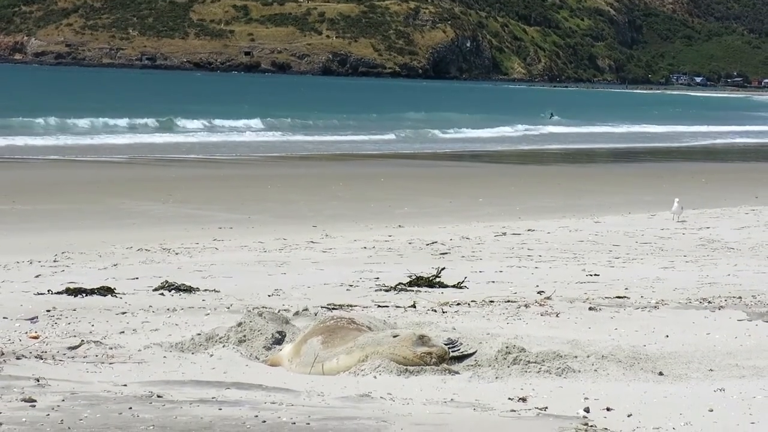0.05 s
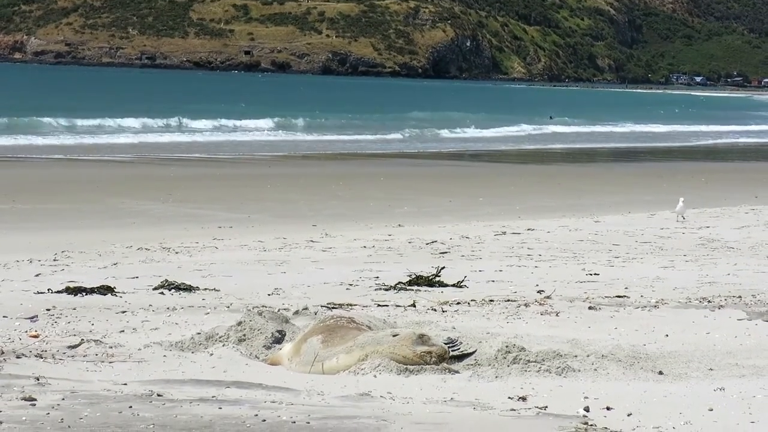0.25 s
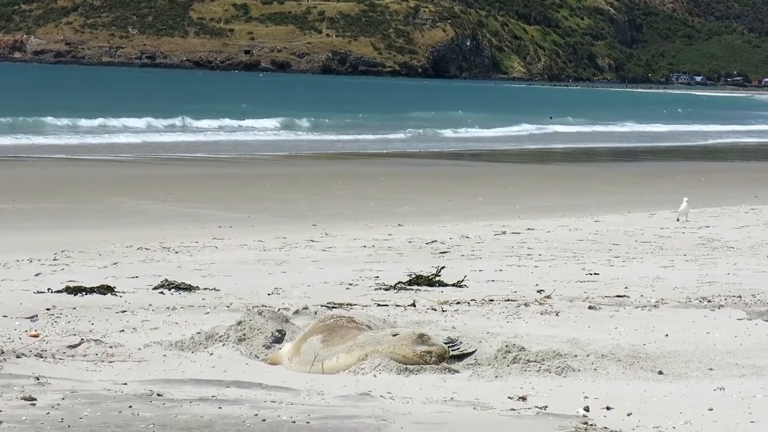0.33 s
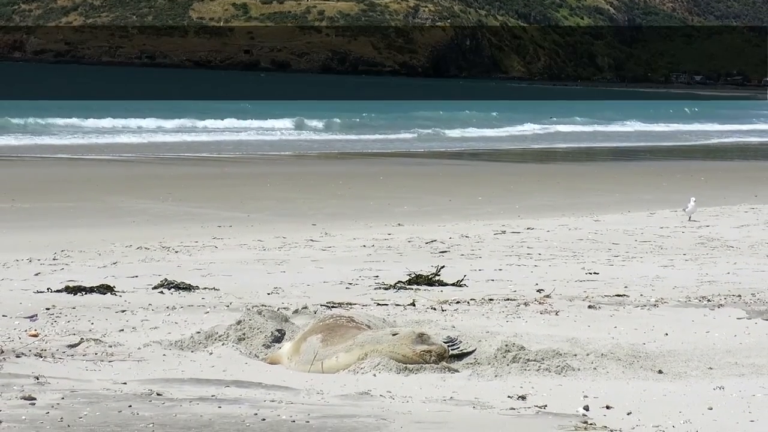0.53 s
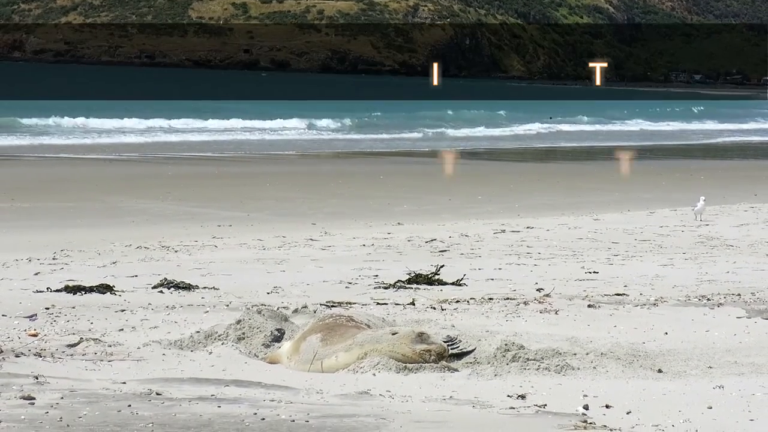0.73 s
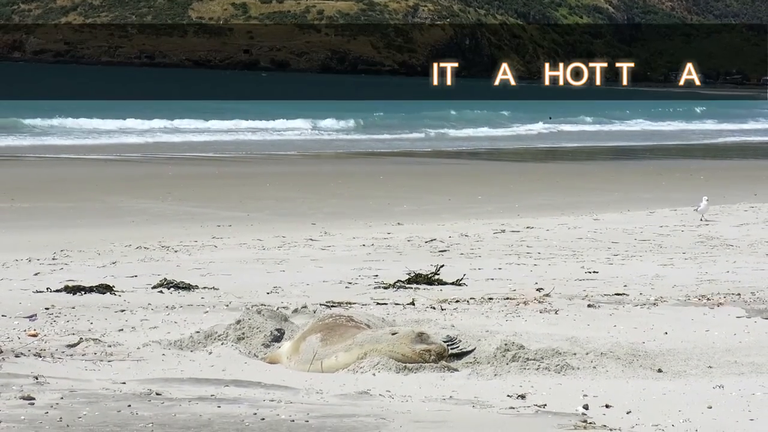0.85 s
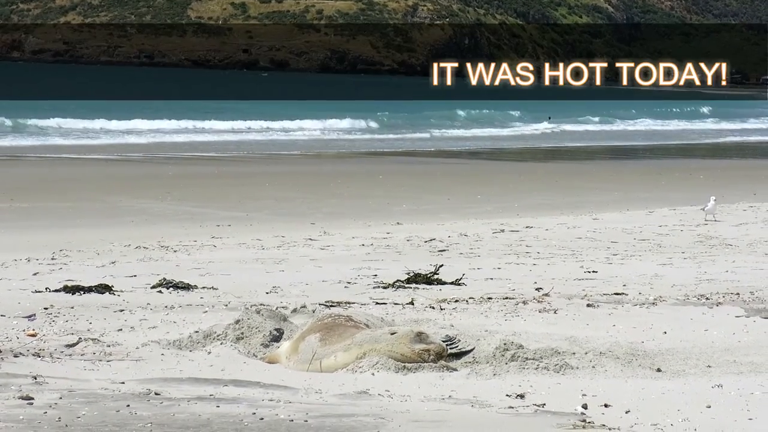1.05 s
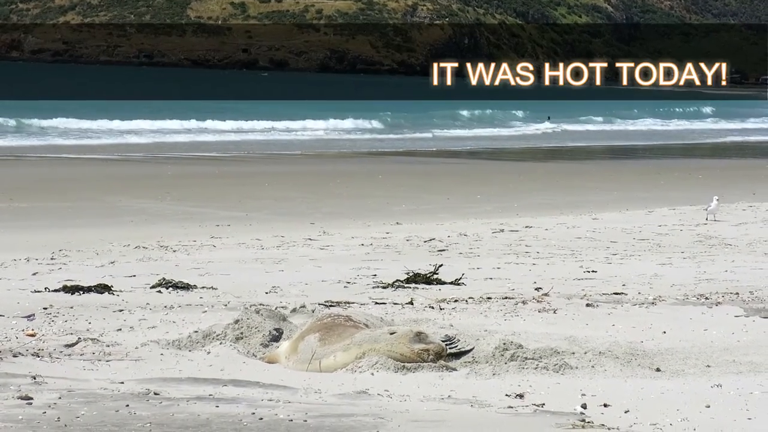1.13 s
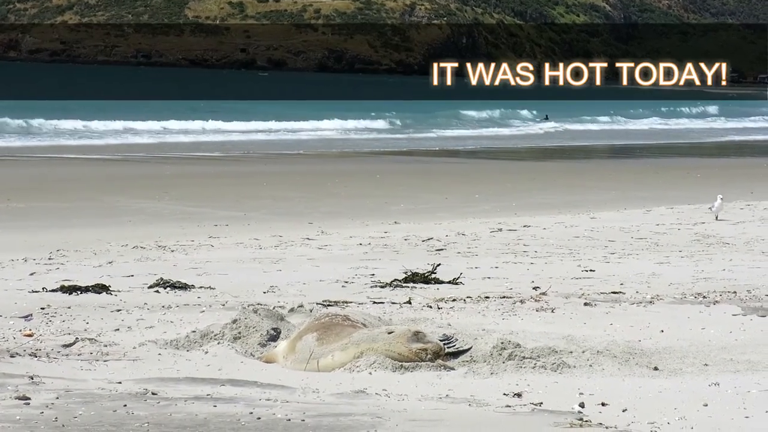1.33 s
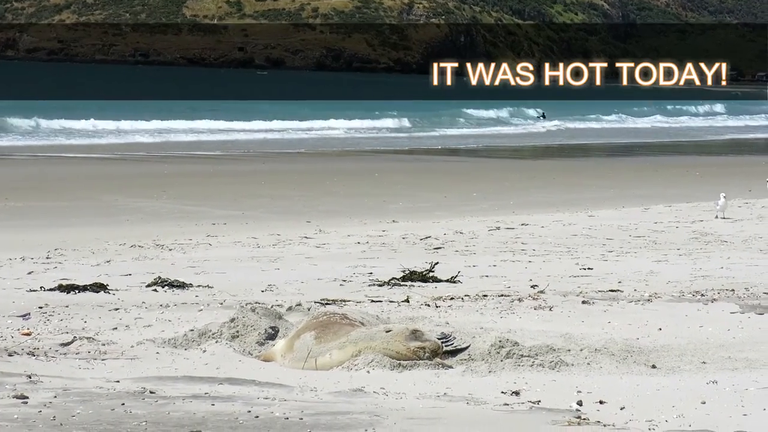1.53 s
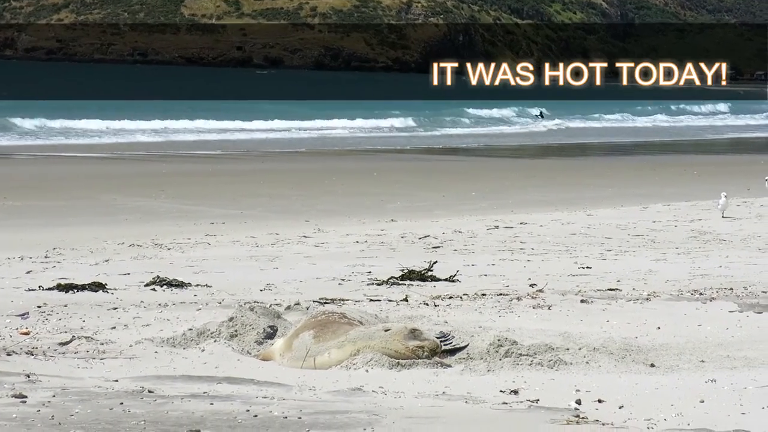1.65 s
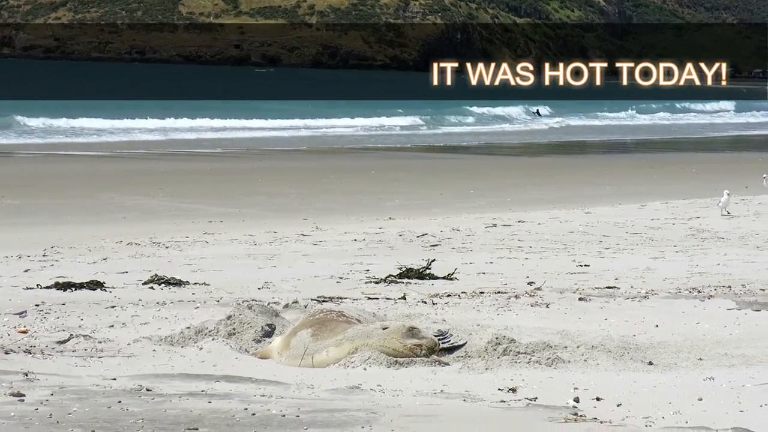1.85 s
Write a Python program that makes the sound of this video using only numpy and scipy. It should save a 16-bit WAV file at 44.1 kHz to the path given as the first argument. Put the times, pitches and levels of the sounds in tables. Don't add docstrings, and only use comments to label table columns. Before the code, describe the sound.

Wind gust buffets and thumps the microphone on an open beach, over soft distant surf wash

```python
import sys
import numpy as np
from scipy import signal
from scipy.fft import rfft, irfft
from scipy.io import wavfile
from scipy.ndimage import uniform_filter1d

SR = 44100
rng = np.random.default_rng(int(sys.argv[2]) if len(sys.argv) > 2 else 0)


def dump_mix(stems):
    frames = np.atleast_2d(stems).T
    limited = np.clip(frames, -1, 1)
    pcm = np.round(limited * 32767).astype(np.int16)
    wavfile.write(sys.argv[1], SR, pcm)


def field_ratio(decibels):
    return 10 ** (np.asarray(decibels, dtype=float) / 20)


N = 83790
T = np.arange(N) / SR


def rms_one(x):
    return x / np.sqrt(np.mean(x ** 2) + 1e-20)


def in_time(rows):
    seconds, *columns = np.transpose(rows)
    return [np.interp(T, seconds, column) for column in columns]


def at_hz(points, hz):
    table_hz, values = np.array(points).T
    return np.interp(np.log(hz), np.log(table_hz), values)


def drift(rate_hz):
    r = np.exp(-2 * np.pi * rate_hz * 40 / SR)
    slow = signal.lfilter([1], [1, -2 * r, r * r], rng.standard_normal(N // 40 + 2002))
    slow = rms_one(slow[2000:])
    return np.interp(np.arange(N) / 40, np.arange(len(slow)), slow)


def coloured(spectrum, even_s=0):
    hz = np.maximum(np.arange(N // 2 + 1) * SR / N, 1)
    octaves_outside = np.abs(np.log2(hz / np.clip(hz, spectrum[0][0], spectrum[-1][0])))
    db = at_hz(spectrum, hz) - 24 * octaves_outside
    x = rms_one(irfft(rfft(rng.standard_normal(N)) * field_ratio(db), N))
    if even_s:
        x = x / np.sqrt(uniform_filter1d(x ** 2, int(even_s * SR)) + 0.07)
    return rms_one(x)


# centre in seconds, level in dB, length in seconds, flap over thud in dB.
BUFFETS = [(0.387, -39.5, 0.016, -20), (0.445, -43, 0.019, -21), (0.481, -39.5, 0.02, -23),
           (0.53, -35, 0.015, -11), (0.58, -26, 0.009, -7), (0.608, -32, 0.021, -11),
           (0.656, -17.5, 0.018, 5), (0.681, -18, 0.024, -6), (0.736, -22.5, 0.02, 0),
           (0.766, -29.5, 0.022, -1), (0.779, -31, 0.0072, 12), (0.804, -29, 0.023, -3),
           (0.827, -30.5, 0.012, -6), (0.891, -23.5, 0.017, -12.5), (0.925, -17, 0.018, 1.5),
           (0.984, -16.5, 0.016, 5.5), (1.009, -15.5, 0.014, 12), (1.04, -27, 0.006, 14),
           (1.057, -24, 0.013, 8), (1.079, -24, 0.036, -4.5), (1.121, -47, 0.015, -2),
           (1.183, -42.5, 0.039, -9), (1.266, -20.5, 0.0057, -2), (1.298, -32, 0.0085, 11),
           (1.312, -26.5, 0.019, -4), (1.361, -22.5, 0.027, -6.5), (1.407, -41.5, 0.024, 4),
           (1.457, -17, 0.0033, 7), (1.467, -23.5, 0.032, -3), (1.492, -20, 0.0067, 12),
           (1.525, -39.5, 0.0058, 12), (1.548, -32, 0.008, -2.5), (1.605, -38, 0.0052, 0),
           (1.526, -52, 0.05, -18), (1.591, -31.5, 0.02, -9), (1.629, -30.5, 0.0096, -9),
           (1.654, -26, 0.014, 8)]
# time in seconds, level in dB.
GUST = [(0, -60), (.34, -49), (.38, -52.5), (.56, -44), (.66, -40.5), (.86, -33.5), (1.05, -32.5),
        (1.14, -40), (1.21, -47.5), (1.25, -44), (1.275, -26), (1.42, -41), (1.5, -35), (1.66, -45.5),
        (1.71, -61.5), (1.9, -66)]
# time in seconds, dB over opposed thud.
VEER = [(0, -19), (.4, -7), (.58, -21), (.68, -13), (.735, -9.5), (.8, -15.5), (.9, -17.5), (1.0, -12.5),
        (1.1, -15.5), (1.2, -16), (1.28, -15), (1.36, -16), (1.42, -15.5), (1.55, -18.5), (1.65, -18.5),
        (1.9, -18)]
# pitch in Hz, level in dB per Hz.
THUD = [(20, -30), (40, -9.5), (60, -4), (90, 5.5), (130, -1), (190, -10), (300, -45)]
# pitch in Hz, level in dB per Hz.
RUMBLE = [(20, -18), (40, -12), (65, 2), (90, 4), (130, 3.5), (190, -4), (300, -35)]
# pitch in Hz, level in dB per Hz.
FLAP = [(80, -21.5), (140, 0.5), (200, -0.5), (300, -5.5), (450, -17), (700, -25.5), (1100, -66),
        (2000, -50)]


def wind():
    gust_flap_db, flap_per_db, gust_lumps_db = 5.5, 2, -4.5
    rise_share, fall_share, evening_s = 0.29, 0.55, 0.012
    left_db, right_db, common_flap_db = 0.5, -2.1, -25.5
    right_port_hz = 950

    gust_db, = in_time(GUST)
    thud_power = field_ratio(gust_db + gust_lumps_db * drift(25)) ** 2
    flap_power = thud_power * field_ratio(gust_flap_db + flap_per_db * (gust_db - gust_db.max())) ** 2
    for s, db, length, flap_db in BUFFETS:
        width = length * np.where(T < s, rise_share, fall_share)
        power = field_ratio(db) ** 2 * np.exp(-((T - s) / width) ** 2)
        thud_power = thud_power + power / (1 + field_ratio(flap_db) ** 2)
        flap_power = flap_power + power / (1 + field_ratio(-flap_db) ** 2)

    thud = np.sqrt(thud_power) * coloured(THUD, 1.2 * evening_s)
    rumble = np.sqrt(thud_power) * coloured(RUMBLE, 1.2 * evening_s)
    flap = np.sqrt(flap_power) * coloured(FLAP, evening_s)
    common_flap = np.sqrt(flap_power) * coloured(FLAP, evening_s)

    yielding = after_slam()
    opposed = yielding * (thud + flap) + slams() + rasps(evening_s / 2)
    left = field_ratio(left_db) * opposed
    right = -field_ratio(right_db) * opposed
    right = signal.lfilter(*signal.butter(1, right_port_hz, fs=SR), right)
    veer_db, = in_time(VEER)
    common = field_ratio(veer_db) * rumble + yielding * field_ratio(common_flap_db) * common_flap
    return np.array([left, right]) + common


# start in seconds, peak in dB, ring in Hz, direction of the first push (1 or -1).
SLAMS = [(.5698, -21, 200, -1), (.6535, -20, 190, 1), (.6804, -3, 170, -1), (.7055, -14.5, 150, 1),
         (.7245, -12.5, 185, -1), (.77, -21, 180, 1), (.9015, -18, 130, -1), (.9255, -21, 280, -1),
         (.9815, -12, 190, -1), (1.0073, -14, 150, 1), (1.0589, -12, 230, -1), (1.0655, -11, 190, 1),
         (1.0782, -18, 120, 1), (1.2608, -23, 250, 1), (1.2742, -15, 170, -1), (1.2894, -14, 170, 1),
         (1.2988, -18, 280, -1), (1.3033, -7.5, 165, -1), (1.3703, -19, 170, -1), (1.448, -22, 260, 1),
         (1.4615, -20, 240, -1), (1.4632, -18, 120, 1), (1.4845, -23, 150, -1), (1.5103, -26, 220, 1),
         (1.6325, -27, 150, -1), (1.6555, -27, 230, -1)]


def slams():
    t60_s, rise_s, soft_hz = 0.034, 0.0009, 850
    out = np.zeros(N)
    t = np.arange(SR // 5) / SR
    for s, db, hz, direction in SLAMS:
        i = int(s * SR)
        swell = field_ratio(db - 60 * t / t60_s + 1.5) * (1 - np.exp(-t / rise_s))
        out[i:i + len(t)] += np.sign(direction) * swell * np.sin(2 * np.pi * hz * t)
    return signal.sosfilt(signal.butter(3, soft_hz, fs=SR, output="sos"), out)


def after_slam():
    yield_s, yield_share = 0.009, 0.8
    dips = [np.exp(-((T - s - yield_s / 2) / yield_s) ** 4) for s, *_ in SLAMS]
    return np.prod([1 - yield_share * dip for dip in dips], axis=0)


# centre in seconds, level in dB, length in seconds.
RASPS = [(.6815, -35.5, .003), (0.736, -43.5, 0.0046), (0.925, -43, 0.0064), (0.991, -44, 0.0091),
         (1.014, -47.5, 0.0099), (1.066, -42, 0.01), (1.274, -40, 0.0051), (1.3004, -37.5, 0.0062),
         (1.356, -47, .005), (1.454, -41.5, .006), (1.51, -49, 0.0033)]
# pitch in Hz, level in dB per Hz.
RASP = [(250, -16), (400, 6), (600, 1), (900, -12), (1100, -17.5), (1500, -19.5)]


def rasps(even_s):
    shape = sum(field_ratio(db) * np.exp(-((T - s) / length) ** 2) for s, db, length in RASPS)
    return shape * coloured(RASP, even_s)


# time in seconds, level in dB, brightness in dB per octave.
WAVES = [(0, -51, 1), (.12, -49, -0.67), (.25, -49, 0.2), (.38, -49, -0.2), (.5, -47.5, -0.3),
         (.6, -47.5, -0.1), (.68, -48.5, 1.2), (.78, -49.5, 0.54), (.9, -51, 0.76), (1.05, -53.5, 0.5),
         (1.18, -52, 0), (1.3, -48.5, -1.5), (1.4, -49, -0.3), (1.5, -47, -1.2), (1.62, -48.5, -1),
         (1.75, -48.5, -1), (1.9, -49.5, -0.5)]
# pitch in Hz, level in dB per Hz.
SURF = [(30, -11), (100, -6.5), (220, 0), (450, -4.5), (1000, -8.5), (3000, -18), (7000, -34.5),
        (15500, -49.5)]
# pitch in Hz, width in Hz, lift in dB.
HOUSING = [(653, 160, 6), (1985, 1060, 5.5), (4547, 1380, 13)]
# pitch in Hz, likeness from -1 to 1.
LIKENESS = [(60, -1), (200, 0.9), (380, -0.22), (700, 0.35), (1290, 0.35), (2380, 1), (5300, 0.91),
            (8600, -0.64)]
# pitch in Hz, left minus right in dB.
LEFTWARD = [(200, -0.5), (400, 2), (700, 2), (1300, 11.5), (2400, 3.5), (4400, 4), (8000, -5.5), (15000, 3)]


def surf():
    patchy_db, bright_top_hz = 0.73, 4740
    left_lag_samples = -2
    level_db, tilt = in_time(WAVES)
    out, together, near = 0, drift(7.0), drift(8.0)
    edges = 30 * 2 ** np.arange(0, 9.2, 0.4)
    white = rng.standard_normal((2, 2, N + 4000))
    for k, (low, high) in enumerate(zip(edges, edges[1:])):
        band = signal.butter(2, [low, high], "band", fs=SR, output="sos")
        mid, side = signal.sosfilt(band, white[k % 2])[:, -N:]
        hz, following = np.sqrt(low * high), drift(9.5)
        lift_db = sum(db / (1 + (2 * (hz - centre_hz) / wide) ** 2) for centre_hz, wide, db in HOUSING)
        bright_db = tilt * np.log2(min(hz, bright_top_hz ** 2 / hz) / 1000)
        flicker = 0.5 * together + 0.54 * (near + following) + 0.28 * drift(25)
        gain = field_ratio(at_hz(SURF, hz) + lift_db + bright_db + patchy_db * flicker)
        pan = field_ratio(at_hz(LEFTWARD, hz) * np.array([[0.5], [-0.5]]))
        alike = np.clip(at_hz(LIKENESS, hz), -0.99, 0.99)
        pair = np.sqrt(1 + alike) * mid + np.sqrt(1 - alike) * side * [[1], [-1]]
        out = out + gain * pan * pair
        near = following
    left, right = field_ratio(level_db) * rms_one(out)
    return np.array([np.roll(left, left_lag_samples), right])


# start in seconds, gain in dB.
CLAMPS = [
    (0.687, -5),
    (1.067, -6.5),
    (1.312, -9),
]


def limiter_gain():
    attack_s, release_db_per_s = 0.0075, 12
    clamps = []
    for s, db in CLAMPS:
        recovering = np.minimum(db + release_db_per_s * (T - s), 0)
        clamps.append(np.where(T >= s, recovering, 0))
    r = np.exp(-1 / (attack_s * SR))
    return field_ratio(signal.lfilter([1 - r], [1, -r], np.min(clamps, axis=0)))


# start in seconds, peak in dB.
TICKS = [
    (0.6794, -68),
    (1.3903, -67.5),
]


def ticks():
    tick_hz, tick_s = 7460, 0.0032
    shape = sum(field_ratio(db) * np.exp(-((T - s - tick_s / 2) / tick_s) ** 2) for s, db in TICKS)
    sos = signal.butter(1, [tick_hz * 0.91, tick_hz * 1.3], "band", fs=SR, output="sos")
    return shape * 0.5 * rms_one(signal.sosfilt(sos, rng.standard_normal((2, N))))


# pitch in Hz, level in dB rms, right share from 0 to 2.
WHINES = [
    (13237, -103, 1),
    (15734, -100, 1.9),
]


def electronics():
    wobble_hz, hiss_db = 1.5, -90
    out = field_ratio(hiss_db) * rng.standard_normal((2, N))
    for hz, db, right in WHINES:
        cycles = hz * T + np.cumsum(wobble_hz * drift(4.7)) / SR
        tone = np.sqrt(2) * field_ratio(db) * np.sin(2 * np.pi * cycles)
        out = out + np.array([[2 - right], [right]]) * tone
    return out


def scene():
    return limiter_gain() * (surf() + electronics()) + wind() + ticks()


def band_limit(x):
    return signal.sosfilt(signal.butter(12, 15780, fs=SR, output="sos"), x)


def record(dry):
    overload = 0.305
    mix = dry / (1 + np.abs(dry / overload) ** 30) ** (1 / 30)
    return band_limit(mix)


dry = scene()
out = record(dry)
dump_mix(out)
```